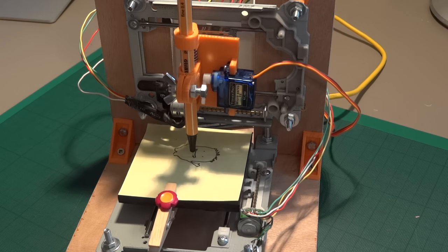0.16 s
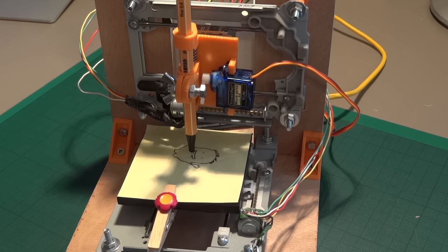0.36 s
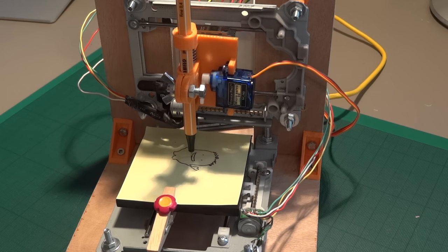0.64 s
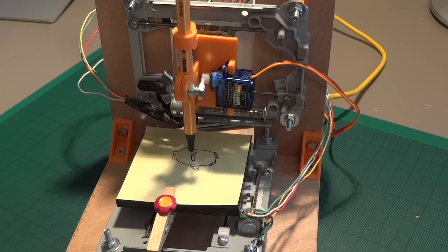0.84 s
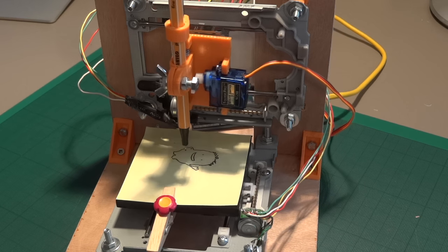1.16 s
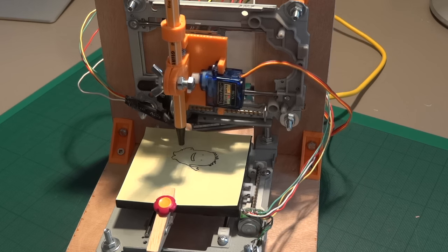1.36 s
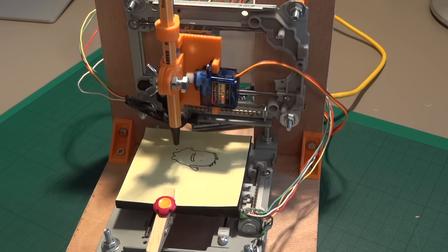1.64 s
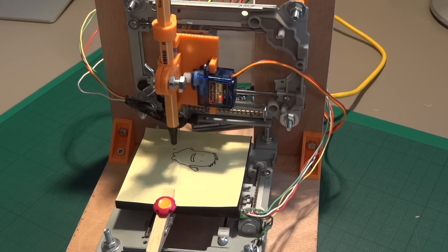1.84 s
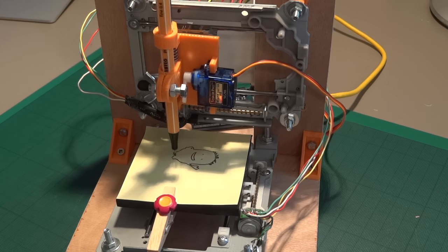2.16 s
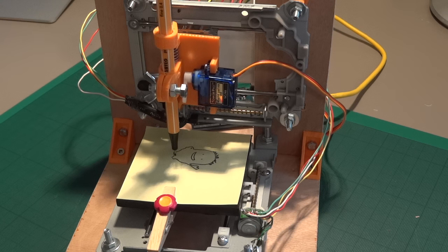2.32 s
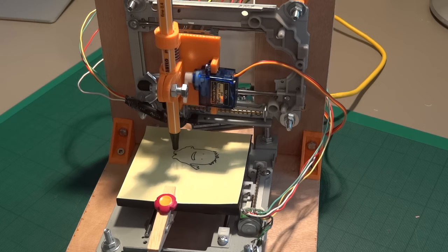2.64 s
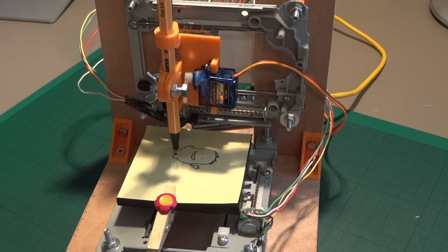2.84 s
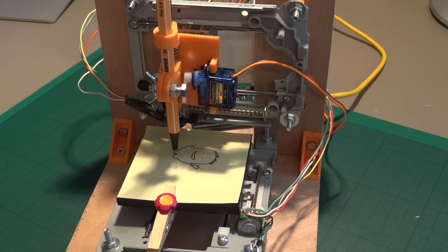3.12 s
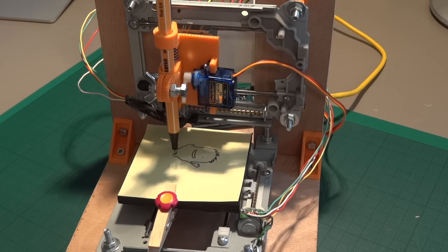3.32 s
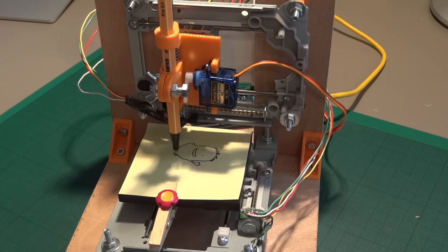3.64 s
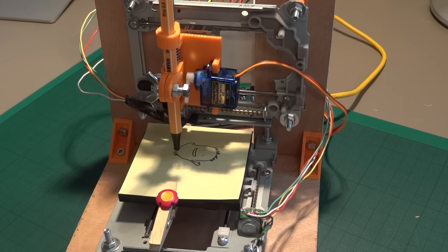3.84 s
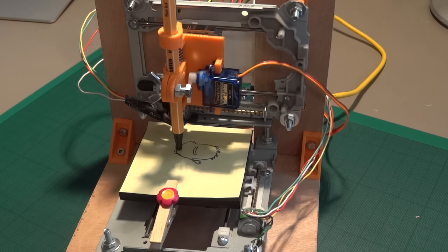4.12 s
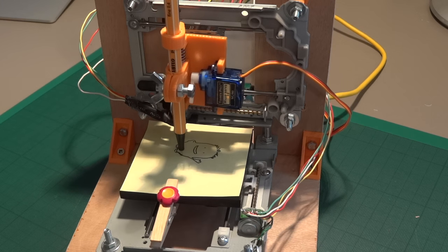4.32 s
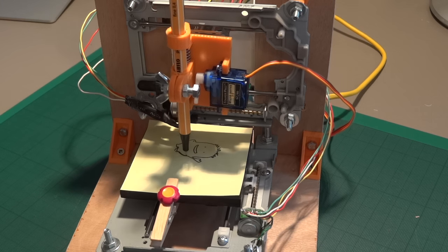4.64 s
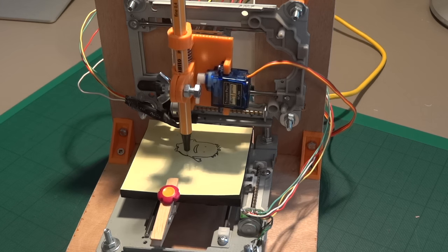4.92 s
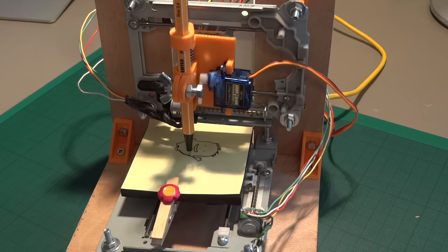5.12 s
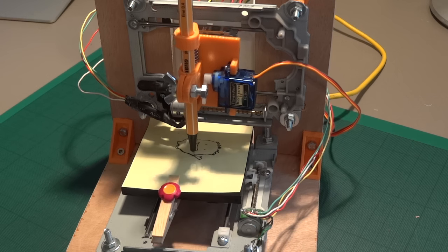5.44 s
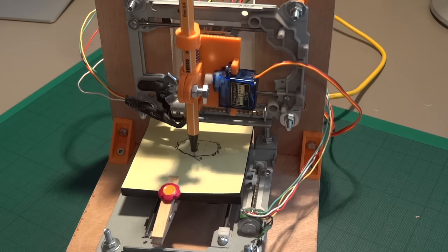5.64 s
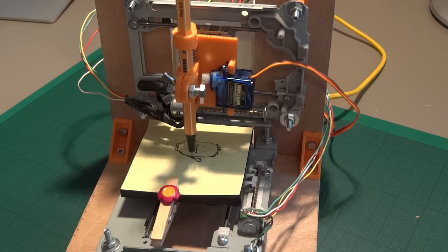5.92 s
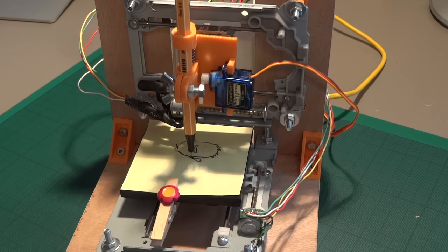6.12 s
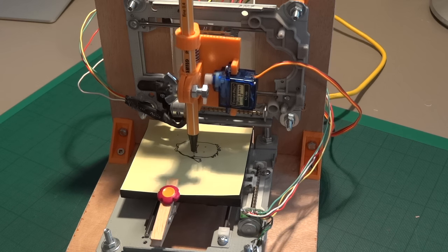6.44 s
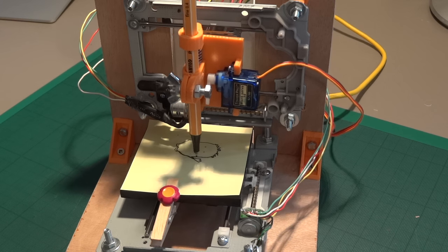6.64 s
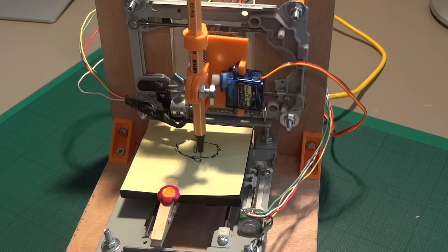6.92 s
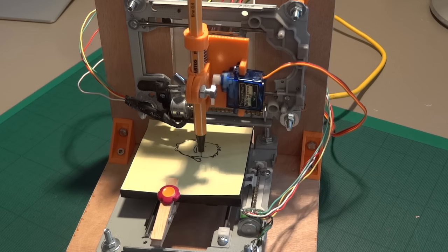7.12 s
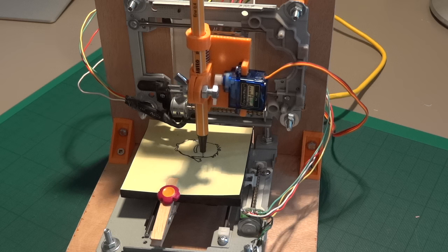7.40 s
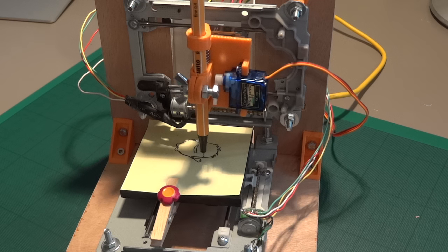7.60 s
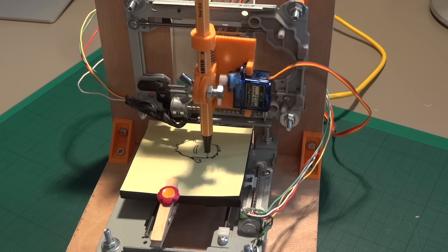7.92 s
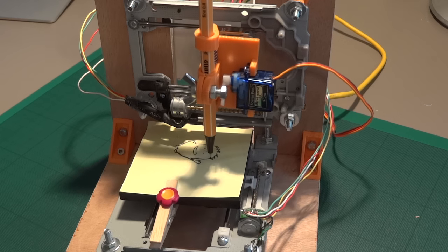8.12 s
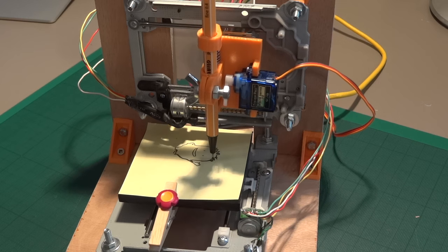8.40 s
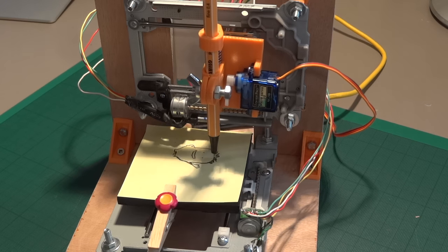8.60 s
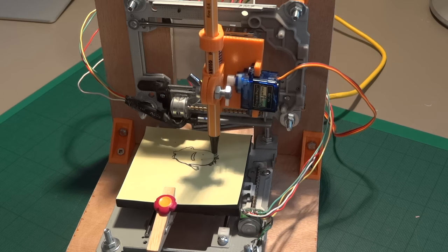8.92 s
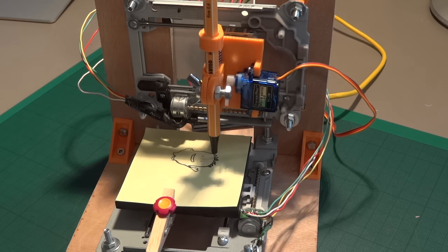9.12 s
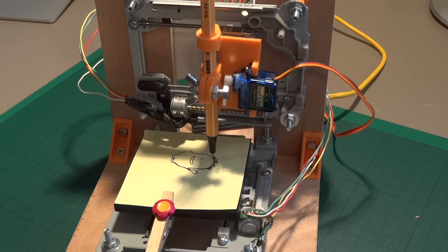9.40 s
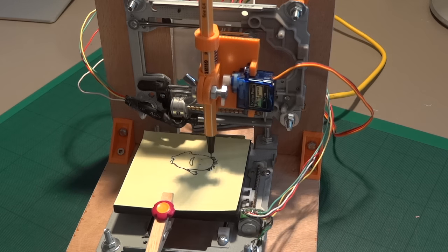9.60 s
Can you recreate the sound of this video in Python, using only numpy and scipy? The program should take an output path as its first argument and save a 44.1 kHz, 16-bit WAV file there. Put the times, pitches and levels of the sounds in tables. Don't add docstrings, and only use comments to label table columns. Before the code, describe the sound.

Close, dry mechanical chatter from a little pen plotter with two stepper motors. It begins with brief rattles, then a hobby servo zips twice about a second apart, with faint singing and snaps between. A long run of stuttering, metallic buzz-like bursts follows, full of knocks and clacks, each separated by tiny gaps. Near the end it becomes quieter and duller. Faint servo ticking and soft room noise lie underneath.

```python
import sys
import numpy as np
from scipy import signal
from scipy.io import wavfile
from scipy.ndimage import uniform_filter1d

SR = 44100
rng = np.random.default_rng(int(sys.argv[2]) if len(sys.argv) > 2 else 0)


def field_ratio(decibels):
    return 10 ** (np.asarray(decibels, dtype=float) / 20)


def persist_wave(psi):
    counts = np.round(np.clip(psi, -1, 1) * 32767).astype(np.int16)
    wavfile.write(sys.argv[1], SR, np.atleast_2d(counts).T)


N = 430416
STEP_HZ = 83.77

# start_s, peak_db, pitch_hz of the part hit
KNOCKS = [(0.0379, -15.5, 4230), (1.1923, -26.5, 4000), (2.079, -17.5, 3160), (3.1814, -15.5, 3160),
          (3.466, -16.5, 2680), (3.5617, -15, 3340), (3.6797, -16, 2643), (3.799, -14, 3096),
          (4.048, -13.5, 3160), (4.1823, -17, 4847), (4.228, -16, 4904), (4.2637, -17, 2926),
          (4.398, -13.5, 4560), (4.4218, -19, 4930), (4.4616, -16, 3000), (4.484, -15.5, 3190),
          (5.0107, -18.5, 5130), (5.055, -16.5, 4903), (5.1595, -15, 4805), (5.2082, -14, 4660),
          (5.2603, -17, 4800), (5.3292, -14.5, 2700), (5.6588, -21.5, 2900), (5.9665, -22.5, 3160),
          (8.0105, -21, 2900), (8.1312, -19, 3028), (8.295, -15, 3015), (8.3615, -20.5, 3150),
          (8.517, -20, 3100), (8.5788, -20, 3127), (4.0116, -15, 5070), (4.2157, -23, 3190),
          (4.3794, -30, 4880), (5.1765, -21, 4900), (5.2802, -19.5, 2900), (5.2989, -17, 4860),
          (5.307, -23, 3200), (5.3406, -19, 4800)]
# start_s, peak_db
TICKS = [(0.07, -27), (.194, -39), (0.222, -28.5), (0.2412, -25), (0.362, -36.5), (0.391, -35.5),
         (0.4276, -30.5), (0.433, -31.5), (.6517, -35), (0.983, -24.5), (1.286, -33), (2.415, -29),
         (3.0047, -27), (3.262, -30), (4.5896, -24), (5.791, -30), (7.2221, -29.5), (8.7542, -35),
         (8.776, -39), (8.801, -38), (8.8133, -31), (8.8311, -27.5), (8.85, -27), (8.862, -28), (8.97, -34),
         (9.0478, -27.5), (9.2142, -28.5), (9.432, -30), (9.5535, -33), (9.744, -28)]
# start_s, peak_db
CLACKS = [(3.158, -35), (3.1792, -36), (3.1792, -30), (3.1921, -22), (3.2611, -37), (3.277, -28),
          (3.358, -29), (3.4642, -35), (3.4661, -32), (3.4712, -24), (3.5624, -23), (3.6797, -34),
          (3.6801, -31), (3.7644, -41), (3.7679, -33), (3.7943, -37), (3.7997, -38), (3.8836, -27),
          (3.9879, -30), (3.9888, -28), (4.0115, -24), (4.0496, -20), (4.1665, -31), (4.1673, -30),
          (4.1841, -29), (4.2154, -30), (4.2629, -22), (4.3504, -38), (4.3785, -34), (4.395, -34),
          (4.5714, -27), (4.592, -32), (4.613, -31), (4.6891, -29), (4.7846, -32), (4.8702, -48),
          (4.8825, -39), (4.985, -33), (5.0091, -28), (5.054, -30), (5.144, -34), (5.1543, -31),
          (5.1862, -25), (5.2081, -26), (5.2601, -19), (5.298, -20), (5.3304, -35), (5.341, -22),
          (5.4351, -41), (5.4351, -35), (5.53, -39), (5.5314, -33), (5.6367, -40), (5.7639, -42),
          (5.776, -35), (5.7906, -24), (5.921, -40), (5.9335, -34), (5.967, -22), (5.9907, -24),
          (6.2597, -30), (6.2612, -27), (6.3255, -36), (6.4223, -40), (6.4323, -40), (6.4468, -33),
                  (6.4523, -24), (6.5231, -23), (6.7426, -40), (6.7426, -31), (6.8005, -23), (6.8254, -30),
                  (6.8434, -31), (6.9097, -31), (6.9207, -29), (7.0998, -49), (7.1003, -49), (7.1302, -33),
                  (7.2011, -45), (7.2225, -42), (7.3218, -30.5), (7.4245, -38), (7.439, -30), (7.5178, -43),
                  (7.5293, -36), (7.5962, -41), (7.6096, -27), (7.6954, -29), (7.7064, -32), (7.7194, -25),
                  (7.7393, -31), (7.7568, -22), (7.7907, -28), (7.7972, -29), (7.8261, -29), (7.8496, -21),
                  (7.9568, -36), (7.9688, -28), (7.9928, -24), (8.0122, -31), (8.0267, -23), (8.0526, -25),
                  (8.0855, -28), (8.0975, -34), (8.112, -22), (8.2307, -34), (8.2427, -31), (8.2542, -26),
                  (8.2776, -34), (8.2911, -20), (8.3375, -29), (8.3519, -27), (8.3624, -32), (8.3624, -25),
                  (8.4831, -44), (8.4831, -29), (8.5181, -34), (8.543, -26), (8.5764, -42), (8.6158, -26)]
# time_s, then screw_db, holder_db re the move, can_db re the rails,
# rail_db re the move
LOOSE = [(0, -5, 2, -1.5, -1.5), (.6, -3, -2.5, -22, -4.5), (1.1, -17, 3.5, 6, -37), (2.1, -11, -6, 4, -10),
         (2.25, -16, -5, 6.5, -12), (2.45, -6, -1, 5, -12.5), (3.4, -16, -3, 2, -15),
         (4.0, -13, -1.5, 0.5, -11.5), (4.6, -5, 3, -6, -9.5), (5.3, -4, -1.5, -5.5, -10.5),
         (5.9, -2, 2, -17, -2), (6.3, 4, 4, -10, -2.5), (6.9, 2, 0, 3.5, -4.5), (7.3, 1.5, 6, 6, -11),
         (7.8, 5, -1, 6.5, -4), (8.5, -14.5, -7.5, 0.5, -17.5), (9.2, -13, -3, -12, -24),
         (9.76, -14, -17, 6, -13)]
# pitch_hz, width_hz, level_db
CARRIAGE = [(2100, 110, -11), (2594, 180, -5), (2880, 100, -4), (3170, 180, 0)]
SCREW = [(3906, 52, 4), (4098, 67, 7.5), (4264, 290, -1)]
PEN_HOLDER = [(4480, 90, -9), (4890, 130, 0), (5130, 130, 0), (5390, 160, -3)]
MOTOR_CAN = [(6420, 200, -3), (6680, 240, 0), (7450, 250, -14)]
RAIL = [(7650, 300, -13), (8780, 150, -9), (9460, 220, 0), (10600, 240, 0)]
FRAME = [(1142, 70, -9.5), (1312, 75, 4.5), (1428, 70, -3), (1628, 80, -5)]


def rattle():
    step_s, carriage_db, frame_db, rail_db = half_steps(spread_db=1.8, jitter_s=.0005, weak_db=-1.5)
    slack_s, slack_hz = 0.0023, 3300
    slack_knocks = [(start + slack_s, knock_db, slack_hz) for start, _, _, knock_db in all_moves()]
    knock_s, knock_db, knock_hz = np.transpose(KNOCKS + slack_knocks)
    tick_s, tick_db = np.transpose(TICKS)
    clack_s, clack_db = np.transpose(CLACKS)
    screw_db, holder_db, can_db, shine_db = in_time(LOOSE)

    far = np.interp(np.arange(N) / SR, (6.78, 7.0), [.001, .999])
    far_pitch = .945
    long_screw = [(hz * far_pitch, width, db) for hz, width, db in SCREW]
    middle_parts = [(CARRIAGE, 2900, 0),
                    (SCREW, 4000, screw_db + 10 * np.log10(1 - far)),
                    (long_screw, 4000, screw_db + 10 * np.log10(far)),
                    (PEN_HOLDER, 5200, holder_db)]
    out = np.zeros(N)
    for part, part_hz, loose_db in middle_parts:
        aim_db = -np.minimum(26 * np.abs(np.log2(knock_hz / part_hz)), 9)
        steps = jolts(step_s, field_ratio(carriage_db - 2.0), .0016, rise_s=.0002, solid=1.3)
        steps = steps + jolts(tick_s, field_ratio(tick_db - 9.5), 0.0029, solid=0.26)
        knocks = jolts(knock_s, field_ratio(knock_db + aim_db - 8.5), .0019, rise_s=.0004, solid=.9)
        out += body(field_ratio(loose_db) * steps + field_ratio(loose_db / 2) * knocks, part, broad_db=-22)

    knock_dull_db, tick_dull_db = -4.5, -13.5
    bright_parts = [(MOTOR_CAN, can_db + shine_db, can_db / 2), (RAIL, shine_db, -3.0)]
    for part, loose_db, hit_db in bright_parts:
        steps = jolts(step_s, field_ratio(rail_db + 3), .001, rise_s=.0002, solid=1.5)
        steps = steps + jolts(tick_s, field_ratio(tick_db + tick_dull_db + 10.0), 0.0015)
        knocks = jolts(knock_s, field_ratio(knock_db + knock_dull_db - 10.5), 0.0055, rise_s=0.0009)
        clacks = jolts(clack_s, field_ratio(clack_db - 9.5), 0.0011, rise_s=0.0001, solid=0.78)
        out += body(field_ratio(loose_db) * (steps + knocks) + field_ratio(hit_db) * clacks, part, broad_db=-19)

    held = field_ratio(-68) * rng.standard_normal(N)
    frame_steps = jolts(step_s, field_ratio(frame_db), 0.0041)
    frame_knocks = jolts(knock_s, field_ratio(knock_db - 17.5), 0.0027)
    return out + body(frame_steps + frame_knocks + held, FRAME, broad_db=-9.5)


def half_steps(spread_db, jitter_s, weak_db):
    first_db, first_fades = -4, 0.11
    bright_weak_db = -3
    rows = []
    for start, stop, carriage_db, _ in all_moves():
        luck, count = rng.standard_normal((60, 4)), np.arange(60)
        times = start + count / (2 * STEP_HZ) + jitter_s * luck[:, 3]
        uneven = first_db * first_fades ** count + weak_db * (count % 2) + spread_db * luck[:, 0]
        levels = uneven[:, None] + [carriage_db, frame_level(start, carriage_db), carriage_db]
        levels += [0, 1.5, 1.5] * luck[:, :3]
        levels[1::2, 2] += bright_weak_db
        rows.append(np.column_stack([times, levels])[times < stop])
    return np.vstack(rows).T


# start_s, stop_s, carriage_db, knock_db as the slack closes
TRAVEL = [(.011, .082, -41, -48), (.168, .256, -58.5, -31), (.327, .44, -64, -49), (.513, .531, -68, -50),
          (.554, .675, -66, -47), (.880, .951, -37.5, -18), (.974, .998, -40.5, -45),
          (1.076, 1.108, -60, -26.5), (1.171, 1.214, -69, -26), (1.268, 1.293, -61, -21),
          (1.358, 1.364, -56, -36), (1.449, 1.489, -68, -21), (1.528, 1.559, -63, -26),
          (1.640, 1.659, -57, -21), (1.694, 1.702, -64, -28), (1.741, 1.773, -57, -22),
          (1.821, 1.842, -51, -26)]
OUTLINE = [(2.003, 2.146, -40, -47), (2.23, 2.244, -38, -19.5), (2.308, 2.338, -48, -22.5),
           (2.392, 2.433, -47, -25.5), (2.492, 2.502, -56, -43), (2.582, 2.626, -46, -51),
           (2.695, 2.736, -55, -32), (2.896, 2.906, -41.5, -35), (2.981, 3.016, -44, -40),
           (3.072, 3.078, -52, -37), (3.157, 3.3, -41.5, -46), (3.357, 3.486, -42.5, -23),
           (3.545, 3.58, -40.5, -47), (3.641, 3.701, -43.5, -28), (3.758, 3.812, -35, -22),
           (3.881, 3.893, -40.5, -16.5), (3.978, 4.086, -33, -26), (4.16, 4.275, -34, -19),
           (4.351, 4.494, -37, -38), (4.568, 4.705, -39.5, -47), (4.781, 4.802, -45, -33),
           (4.876, 4.909, -37.5, -45), (4.977, 5.083, -35.5, -43), (5.145, 5.356, -35, -45),
           (5.427, 5.463, -36.5, -29), (5.525, 5.56, -39.5, -20), (5.63, 5.666, -43, -24.5),
           (5.753, 5.815, -45, -45), (5.911, 6.001, -46, -48)]
CLOSING = [(6.169, 6.171, -79, -27.5), (6.262, 6.335, -42, -21.5), (6.422, 6.435, -43.5, -34),
           (6.447, 6.635, -41.5, -38), (6.712, 6.723, -47, -47), (6.7362, 6.935, -41, -45),
           (7.091, 7.139, -49, -52), (7.197, 7.252, -54.5, -34), (7.321, 7.37, -50.5, -29.5),
           (7.419, 7.454, -51, -45), (7.508, 7.532, -54.5, -41), (7.607, 7.624, -48.5, -32.5),
           (7.694, 7.897, -44, -45), (7.964, 8.07, -47, -31), (8.09, 8.147, -44.5, -21),
           (8.231, 8.375, -41.5, -23), (8.475, 8.587, -46.5, -26), (8.612, 8.645, -39.5, -17),
           (8.727, 8.867, -61, -45), (8.928, 8.988, -76, -42), (9.017, 9.078, -63, -43),
           (9.165, 9.272, -66, -28), (9.377, 9.448, -63, -39), (9.527, 9.61, -61.5, -47),
           (9.712, 9.767, -60, -51)]


def all_moves():
    return TRAVEL + OUTLINE + CLOSING


# time_s, level_db
LOAD = [(0, -44.5), (.7, -51.5), (1.3, -42.5), (1.9, -48), (2.25, -46.5), (2.35, -62), (2.6, -51),
        (3.0, -49.5), (3.4, -46), (4.3, -47), (4.8, -49), (5.5, -45.5), (6.1, -47.5), (6.5, -49.5),
        (7.5, -49.5), (8.0, -44), (8.8, -49.5), (9.7, -46)]


def frame_level(start, carriage_db):
    return np.interp(start, *np.transpose(LOAD)) + 0.3 * (carriage_db + 51)


# start_s, peak_db, pitch_hz
SNAPS = [(1.0798, -28, 5330), (1.174, -33, 5440), (1.193, -26, 4000), (1.2404, -34, 3120),
         (1.273, -30, 5500), (1.36, -49, 3360), (1.4525, -39, 3100), (1.5295, -30, 3980),
         (1.644, -38, 3210), (1.6985, -22, 3950), (1.7463, -27, 3100), (1.8267, -28, 5400),
         (8.7296, -42, 5430), (8.7543, -40, 4850), (8.7782, -42, 4900), (8.8016, -34, 5130),
              (8.8311, -32, 5470), (8.85, -36, 4910), (8.9473, -48, 5140), (8.9703, -46, 4880),
              (9.0196, -44, 4820), (9.0485, -33, 5330), (9.151, -47, 5160), (9.1688, -34, 5450),
              (9.2167, -31.5, 5420), (9.4342, -42, 5400), (9.5547, -42, 5390), (9.733, -41, 5400)]


def snaps():
    ring_s, crack_s = 0.0031, 0.00085
    out, t = np.zeros(N), np.arange(800) / SR
    for start, db, hz in SNAPS:
        rough = 1 + .5 * rng.standard_normal(len(t))
        ring = np.sin(2 * np.pi * hz * t) * np.exp(-t / ring_s) * rough
        crack = np.diff(rng.standard_normal(len(t) + 1)) * np.exp(-t / crack_s)
        snap = field_ratio(db) * (field_ratio(-7) * ring + field_ratio(-12) * crack)
        first = int(start * SR)
        out[first:first + len(t)] += snap[:N - first]
    return out


# start_s, stop_s, level_db
BED_MOVES = [(0.149, .20, -53), (0.316, 0.441, -50.5), (.510, 0.673, -51), (2.496, 2.505, -50.5),
             (2.578, 2.63, -49.5), (2.693, 2.74, -48), (2.762, 2.817, -63), (8.717, 8.873, -47),
             (8.933, 8.985, -50), (9.02, 9.08, -47), (9.14, 9.276, -46.5), (9.343, 9.448, -51),
             (9.525, 9.621, -51.5), (9.702, 9.76, -49.5)]
# pitch_hz, width_hz, level_db
BED = [(1327, 113, 1), (1467, 94, -2), (1576, 79, -5.5), (2100, 215, -5.5), (2490, 290, -10.5)]


def bed():
    jerk_db = 3.5
    rows = []
    for start, stop, db in BED_MOVES:
        luck, count = rng.standard_normal((20, 2)), np.arange(20)
        later = count > 0
        times = start + count / STEP_HZ + 0.000578 * luck[:, 1] * later
        levels = db + jerk_db * (count == 0) + 2.9 * luck[:, 0] * later
        rows.append(np.column_stack([times, levels])[times < stop])
    step_s, step_db = np.vstack(rows).T
    return body(jolts(step_s, field_ratio(step_db + 4.5), 0.0034, solid=0.55), BED, broad_db=-12)


# pitch_hz, width_hz, level_db
BOARD = [(240, 115, -7.5), (369, 91, 3), (504, 66, -6.5), (713, 115, 3.5), (870, 57, -12), (1300, 69, 6.5),
         (1480, 150, -17), (2093, 386, 5), (2900, 4000, -3)]
# time_s, step_tone_db, overtones_db
HUM = [(0, -80, -59.5), (.9, -85, -70), (1.0, -64, -67), (1.8, -70, -64.5), (1.95, -86, -85),
       (4.65, -69.5, -63), (5.0, -84, -58.5), (6.3, -69.5, -58.5), (6.95, -67.5, -66.5), (7.1, -91, -82),
       (7.6, -94, -85), (7.75, -69.5, -61), (8.4, -69.5, -71), (8.7, -89, -72), (9.76, -73, -54)]
# multiple, level_db
OVERTONES = [(3, -2.5), (4, -6), (5, -34), (6, -8)]
# start_s, stop_s, pitch_hz, level_db
SLOW_FEED = (.95, 1.85, 893, -67.5)


def thrum():
    first_torque_db = -8
    t, turning, pulses = np.arange(N) / SR, np.zeros(N), []
    for start, stop, carriage_db, _ in all_moves():
        turning[(t > start - .018) & (t < stop + .012)] = 1
        for s in start - .012 + np.arange(30) / STEP_HZ:
            if 0 < s < stop:
                pulses.append((s, frame_level(start, carriage_db) + first_torque_db * (s < start - .006)))
    pulse_s, torque_db = np.transpose(pulses)
    pulse_db = torque_db + 2.5 + rng.normal(0, 3.18, len(pulse_s))
    rumble = body(jolts(pulse_s, field_ratio(pulse_db), 0.0064, rise_s=0.0023, solid=0.31), BOARD, broad_db=-4.5)

    turning = uniform_filter1d(turning, size=700)
    uneven_load = rms_one(uniform_filter1d(rng.standard_normal(N), size=1500))
    turning *= field_ratio(3.1 * uneven_load)
    tone_db, overtones_db = in_time(HUM)
    pace_waver = rms_one(uniform_filter1d(rng.standard_normal(N), size=2000))
    turn = 2 * np.pi * STEP_HZ * t + .15 * pace_waver
    hum = field_ratio(tone_db) * (np.sin(turn) * (0.48 + 0.43 * turning) + field_ratio(3) * turning * np.sin(2 * turn))
    overtones = sum(field_ratio(db) * np.sin(round(k) * turn + k * k) for k, db in OVERTONES)
    hum += field_ratio(overtones_db) * turning * overtones

    start, stop, rod_hz, rod_db = SLOW_FEED
    rod = body(rng.standard_normal(N) * (t > start) * (t < stop), [(rod_hz, 40, 0)], broad_db=-40)
    return rumble + hum + field_ratio(rod_db) * rod


# time_s, whir_db
SWINGS = [
    [(.746, -72), (.755, -43.5), (.868, -36), (.906, -23), (.935, -28.5), (.96, -37), (1.0, -56),
     (1.04, -68)],
    [(1.905, -55), (1.922, -32), (1.936, -23), (1.99, -25), (2.015, -36.5), (2.07, -38), (2.165, -55.5),
     (2.2, -75)],
    [(2.73, -75), (2.77, -63), (2.83, -64), (2.88, -78)],
]
# time_s, pitch_hz, whine_db re the whir
MESH = [(.75, 1490, -38), (.80, 1768, -14), (.83, 2002, -14), (.872, 2120, -23), (.878, 2100, -40),
        (.884, 2540, -15), (.914, 2120, -12.5), (.934, 1678, -9), (.962, 1480, -16), (1.0, 1290, -25),
        (1.91, 1142, -30), (1.945, 1340, -21.5), (1.98, 1423, -20), (2.01, 1400, -17), (2.15, 1353, -26)]
# multiple, level_db
MESH_ORDERS = [(1, -17), (2, 7.5), (3, 2), (4, 2), (5, -10)]
# pitch_hz, width_hz, level_db
SERVO_CASE = [(3160, 360, -15.5), (4170, 340, -10), (5330, 490, -11.5), (6600, 660, -0.5), (8350, 620, -3),
              (10800, 970, -9)]


def servo():
    hold_hz, hold_db = 50.1, -70
    second_stage, second_stage_db = 1.17, -5
    t = np.arange(N) / SR
    whir = sum(field_ratio(in_time(rows)[0]) * (t > rows[0][0]) * (t < rows[-1][0]) for rows in SWINGS)
    mesh_hz, whine_db = in_time(MESH)
    drift = signal.lfilter([1], [1, -.99], rng.standard_normal(N))
    wobble = rms_one(signal.lfilter([1], [1, -.99], drift))
    turn = 2 * np.pi * np.cumsum(mesh_hz * (1 + .02 * wobble)) / SR
    whine = 0
    for k, db in MESH_ORDERS:
        second = field_ratio(second_stage_db) * np.sin(round(k) * second_stage * turn)
        whine = whine + field_ratio(db) * (np.sin(round(k) * turn) + second)
    teeth = rms_one(jolts(rng.random(30000) * N / SR, field_ratio(rng.normal(0, 1.3, 30000)), 0.0014))
    ticks = rms_one(jolts(np.arange(.012, N / SR, 1 / hold_hz), 1, 0.00077))
    return body(whir * (teeth + field_ratio(whine_db) * whine) + field_ratio(hold_db) * ticks, SERVO_CASE, broad_db=-16.5)


def reverb(x, t60, side_cut_hz):
    t = np.arange(int(.5 * SR)) / SR
    mid, side = rng.standard_normal((2, len(t))) * field_ratio(-60 * t / t60) * (t > .009)
    side = signal.lfilter(*signal.butter(1, side_cut_hz, fs=SR), side) * field_ratio(6.5)
    tails = np.stack([mid + side, mid - side]) / np.sqrt(np.sum(mid ** 2))
    tails = signal.lfilter(*signal.butter(2, [330, 8000], "band", fs=SR), tails)
    return signal.fftconvolve(x[None], tails, axes=1)[:, :N]


# pitch_hz, level_db per Hz
ROOM = [(18, -62), (30, -25), (151, -2), (1000, -2), (1320, 4), (1730, -16.5), (2060, -4), (3150, -9.5),
        (5060, -11.5), (6990, -23), (10200, -11), (11500, -6), (15000, -61), (22000, -120)]
# pitch_hz, likeness (0-1)
LIKENESS = [(40, 0), (80, 0.6), (150, 1), (280, 0.26), (600, 0), (1500, 0), (4000, 0.74), (10000, 0.74)]


def room_tone():
    room_db = -52
    out, edges = 0, 28 * 2 ** np.arange(0, 9.1, .5)
    white = rng.standard_normal((2, 2, N))
    for k, (low, high) in enumerate(zip(edges, edges[1:])):
        band = signal.butter(2, [low, high], "band", fs=SR, output="sos")
        mid, side = signal.sosfilt(band, white[k % 2])
        hz = np.sqrt(low * high)
        alike = np.clip(at_hz(LIKENESS, hz), 0, 1)
        stereo = np.sqrt(1 + alike) * mid + np.sqrt(1 - alike) * side * [[1], [-1]]
        out = out + field_ratio(at_hz(ROOM, hz)) * stereo
    return field_ratio(room_db - 3.0) * rms_one(out)


def jolts(times, sizes, decay_s, rise_s=0.0003, solid=0.):
    clicks = np.full(N, 1e-18)
    np.add.at(clicks, np.clip((np.asarray(times) * SR).astype(int), 0, N - 1), sizes)
    swell, fade = np.exp(-1 / (rise_s * SR)), np.exp(-1 / (decay_s * SR))
    burst = signal.lfilter([1 - swell], np.convolve([1, -swell], [1, -fade]), clicks)
    return burst * rng.standard_normal(N) + solid * np.sqrt(decay_s * SR / 2) * clicks


def body(x, modes, broad_db):
    edges = [modes[0][0] * .92, min(modes[-1][0] * 1.1, .45 * SR)]
    band = signal.butter(2, edges, "band", fs=SR, output="sos")

    def ring(v):
        out = field_ratio(broad_db) * signal.sosfilt(band, v + 1e-18)
        for k, (hz, width, level_db) in enumerate(modes):
            r = np.exp(-np.pi * width / SR)
            poles = [1, -2 * r * np.cos(2 * np.pi * hz / SR), r * r]
            mode = (1 - r * r) / 2 * signal.lfilter([1, 0, -1], poles, v + 1e-18)
            out += (-1) ** k * field_ratio(level_db) * mode
        return out
    return ring(x) / np.sqrt(np.sum(ring(signal.unit_impulse(SR // 4)) ** 2))


def rms_one(x):
    return x / np.sqrt(np.mean(x ** 2) + 1e-20)


def in_time(rows):
    s, *columns = np.transpose(rows)
    return [np.interp(np.arange(N) / SR, s, c) for c in columns]


def at_hz(points, hz):
    table_hz, value = np.transpose(points)
    return np.interp(np.log(hz), np.log(table_hz), value)


def scene():
    plotter = rattle() + bed() + snaps() + thrum() + servo()
    return plotter + field_ratio(-9.0) * reverb(plotter, t60=0.31, side_cut_hz=370) + room_tone()


def roll_off(x):
    return signal.sosfilt(signal.butter(12, 12350, fs=SR, output="sos"), x)


def record(dry):
    thin = signal.sosfilt(signal.butter(2, 55, "high", fs=SR, output="sos"), dry)
    steep = signal.ellip(8, .5, 34, 11050, fs=SR, output="sos")
    top_cut = np.vstack([steep, signal.butter(8, 12300, fs=SR, output="sos")])
    return roll_off(signal.sosfilt(top_cut, thin))


dry = scene()
out = record(dry)
persist_wave(out)
```